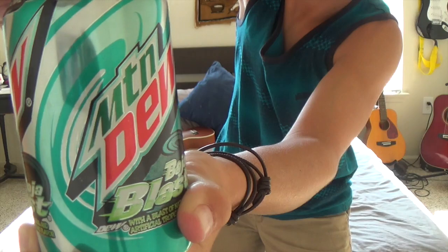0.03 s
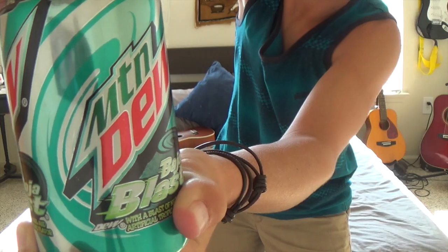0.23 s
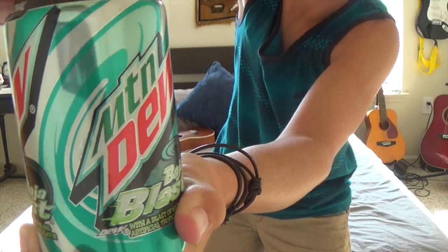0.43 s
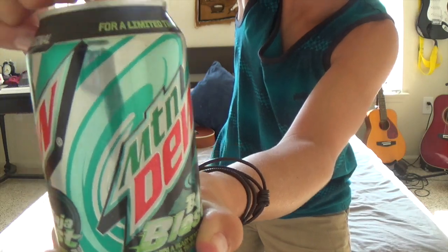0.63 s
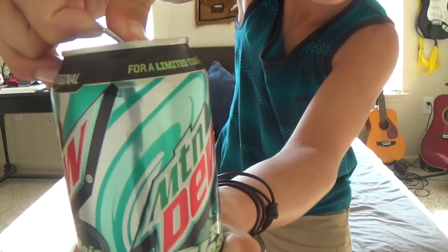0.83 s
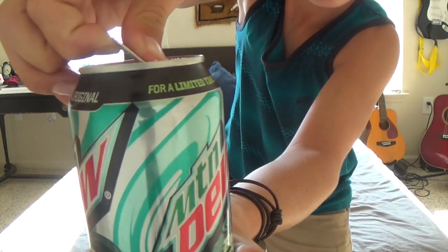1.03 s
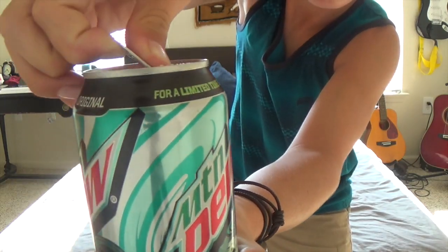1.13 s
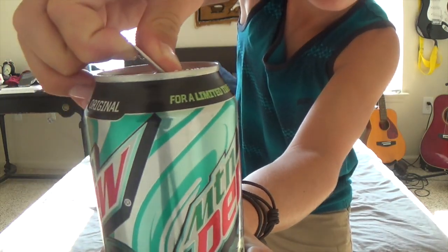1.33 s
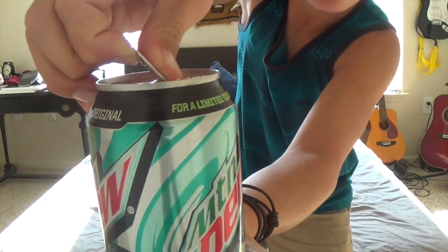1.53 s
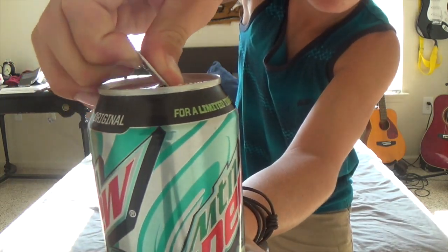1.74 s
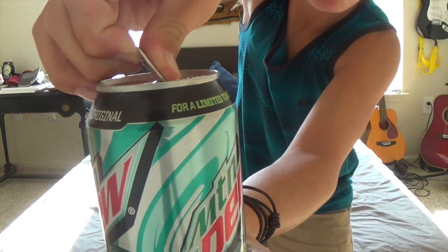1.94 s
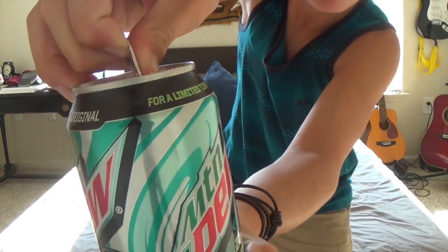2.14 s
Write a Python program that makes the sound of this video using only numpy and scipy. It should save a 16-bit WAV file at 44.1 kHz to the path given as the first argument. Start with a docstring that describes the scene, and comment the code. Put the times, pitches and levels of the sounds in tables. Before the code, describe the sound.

A drink can is opened close by in a small quiet room. At first there is only low room hiss, a faint electronic whine and soft finger rubbing. From about 1.4 seconds the lid clicks sharply, leaking wisps of gas. Another crack at 1.8 seconds leads into quickening metal snaps. At about 2.1 seconds the lid pops open and gas gushes out in a short, quickly fading hiss.

```python
"""A finger levers up the tab of an aluminium drink can, close by in a small quiet room.
Room rumble, hiss and a faint pulsing electronic whine come in first and stay; fingers rub the can.
From 1.4 s the strained lid clicks and lets out wisps of gas.
From 1.8 s its ring drops as the score tears in quickening snaps.
At 2.09 s the flap pops in and the gas gushes out, fading as the pressure drops."""
import sys
import numpy as np
from scipy import signal
from scipy.fft import rfft, irfft, next_fast_len
from scipy.io import wavfile
from scipy.ndimage import map_coordinates

SR = 44100
rng = np.random.default_rng(int(sys.argv[2]) if len(sys.argv) > 2 else 0)


def wav_record(signal):
    """Record a signal, one row per channel, as 16-bit PCM in the file named by sys.argv[1]."""
    frames = np.transpose(np.atleast_2d(signal))
    bounded = np.clip(frames, -1, 1)
    # unit amplitude maps onto the largest positive 16-bit level
    quanta = np.round(bounded * 32767).astype(np.int16)
    wavfile.write(sys.argv[1], SR, quanta)


N = 96402
T = np.arange(N) / SR

# lid snaps: start_s, crack_db, tilt_db_per_octave, top_db, low_hz, low_db, high_hz, high_db, hollow_db
SNAPS = [ (0.1803, -35, -6, -6, 4500, -45, 5600, -42, -75),
         (1.3984, 6.5, -.8, -3, 4000, -12, 5700, -10, -70), (1.4643, 6, 7, 4, 3980, -21, 5650, -16, -52),
         (1.4708, -8, -.5, -2, 4000, -35, 5620, -17, -58),
         (1.5412, -10.5, -4.5, -2, 4000, -44, 5700, -32, -50),
         (1.7803, 9, 1.5, -3.5, 5350, -14, 9850, -15, -38), (1.7881, -5, -3, -4, 5330, -23, 9800, -33, -46),
         (1.8479, -12, -4, -8, 4120, -18, 9600, -27, -39),
         (1.8533, -8, -3, -7, 4200, -18.5, 9500, -27, -41),
         (1.8805, -16, -1, -5, 4200, -33, 9400, -34, -54),
         (1.8915, -6, -2.5, -4, 4350, -28, 9300, -26, -41), (1.9063, -16, 1, -3, 4900, -47, 9300, -37, -60),
         (2.0067, -3.5, -5, 5, 5020, -23, 9130, -25, -33), (2.0356, 2, -2, -2, 4680, -12, 9040, -13, -34),
         (2.0455, -14, -1, -4, 4600, -27, 8900, -30, -52), (2.0549, -9, -4, -2, 4400, -28, 8950, -23, -41),
         (2.0595, 0, -3, 2, 4280, -14, 9000, -17, -37), (2.0688, 3.5, -1.5, 2, 4000, -18, 9100, -10, -36),
         (2.0740, 3, 0, 1, 3800, -29, 8900, -10, -38), (2.0808, -7, -3, 0, 3500, -33, 8800, -33, -41),
         (2.0823, -3, -2, 0, 3300, -29, 6000, -29, -41), (2.0852, 11, -2, 5, 3000, -18, 7000, -18, -30)]
# crack spectrum: freq_hz, level_db
CRACK_COLOUR = [(300, -40), (520, -33), (800, -25), (1400, -18), (2300, -14.5), (3200, -11), (4500, -4.5),
                (6100, -2), (7150, -13), (8300, -1), (10100, -3), (11150, -15), (12200, -3), (13600, -7),
                (14600, -10), (16000, -27)]
# reach of top_db: freq_hz, share
CRACK_TOP = [(10000, 0), (13500, 1)]
# lid overtones in every crack: pitch_hz, boost_db
LID_OVERTONES = [(6300, 5), (9100, 4), (10100, 6), (12500, 6), (13600, 4)]
# modes of the can's hollow at 2 s: pitch_hz, level_db, t60_s
HOLLOW_MODES = [(765, 0, .021), (1060, -3, .009), (1520, -2, .007), (1950, -1, .007)]
# the seam gives, then the flap: time_s, dip_db
PRESSURE_DIPS = [(1.4648, -39), (2.0864, -15)]
# noise envelopes: start_s, rise_s, hold_s, fall_db_per_s, level_db
SEEP_ENVELOPE = (2.05, .04, .005, 300, -36)
GUSH_ENVELOPE = (2.086, .024, .028, 115, -19.1)
SCRAPE_ENVELOPE = (2.022, .045, .012, 500, -45)
DRAUGHT_ENVELOPE = (2.088, .004, .016, 330, -46)
# gas after hard snaps: start_s, rise_s, hold_s, fall_db_per_s, level_db, treble_db, low_hz, high_hz
WISPS = [(1.403, .016, .012, 270, -42.6, -12, 4000, 5750), (1.467, .02, .017, 235, -31.3, -1, 3920, 5620),
         (1.786, .018, .018, 260, -37.7, -11, 4550, 5350)]
# reach of treble_db: freq_hz, share
WISP_TREBLE = [(7000, 0), (15000, 1)]
# gush balance, added left and taken from the right: freq_hz, gain_db
GUSH_PAN = [(200, 0), (500, -.7), (1000, -.6), (2500, -.3), (5000, .1), (10000, .25)]
# fingers shifting on the can: time_s, level_db
RUB_LEVELS = [(.09, -63), (.17, -69), (.3, -76), (.7, -69), (1.1, -65), (1.38, -65), (1.6, -76)]
# noise spectra: freq_hz, level_db
GUSH_COLOUR = [(100, -42), (400, -29), (800, -10.5), (1200, 1.6), (1550, -1), (2050, -7.3), (2900, .6),
               (3900, 1), (4700, -6), (5300, -5), (6400, -8), (7500, -5), (8600, -6), (10000, -2),
               (11500, -2), (13000, -7), (14300, -14), (15400, -44)]
WISP_COLOUR = [(300, -45), (700, -24), (1100, -20), (2300, -14), (3100, -17), (4500, -11), (6600, -9),
               (7300, -8.5), (8000, -4.5), (9600, 0), (10800, -6), (12000, -4), (15500, -11)]
DRAUGHT_COLOUR = [(30, 0), (70, -4), (160, -23), (1500, -110)]
RUB_COLOUR = [(500, -8), (1500, -2), (5000, 0), (7000, -2), (9500, 1), (14000, -7)]
ROOM_COLOUR = [(200, -6), (700, 1.5), (1500, 2.2), (3200, -2), (5600, .5), (7500, -3), (10000, -3.2),
               (15000, -5.5)]
FLOOR_COLOUR = [(20, -14), (30, -6), (45, -1), (80, -1), (150, 0), (260, -6.5), (400, -8.5), (800, -13),
                (1600, -16), (2800, -17.5), (4500, -18.8), (7000, -20.3), (9500, -19.3), (13000, -22.8),
                (15000, -26), (16000, -23.5)]
# left-right likeness of noise: freq_hz, correlation
GUSH_STEREO = [(200, .95), (800, .62), (3000, .62), (6000, .55), (7500, .98)]
ROOM_STEREO = [(200, .97), (1000, .65), (4000, .55), (6000, .65), (7500, .985)]
FLOOR_STEREO = [(60, 1.0), (180, 0.94), (550, 0.21), (1650, 0.18), (4970, 0.77), (15000, 1.0)]
# room decay: freq_hz, t60_s
ROOM_DECAY = [(200, .35), (1500, .45), (5500, .5), (10000, .36), (15000, .24)]


def lid(size=4096, hollow_rise_per_s=.35):
    """Each snap: a crack, two short rings of the strained lid, a knock of the can's hollow."""
    cracks, rings, knocks = np.zeros((3, N + size))
    t = np.arange(size) / SR
    for start_s, crack_db, tilt_db, top_db, low_hz, low_db, high_hz, high_db, hollow_db in SNAPS:
        onset = round(start_s * SR)
        span = slice(onset, onset + size)
        cracks[span] += amp(crack_db) * crack(t, tilt_db, top_db)
        rings[span] += ring(t, low_hz, low_db, t60_s=.0105, jitter_rad=.05)
        rings[span] -= ring(t, high_hz, high_db, t60_s=.0082, jitter_rad=.05)
        pitch_ratio = 1 + hollow_rise_per_s * (start_s - 2)  # rises as the lid lifts
        for k, (hz, db, t60_s) in enumerate(HOLLOW_MODES):
            knocks[span] -= (-1) ** k * ring(t, pitch_ratio * hz, hollow_db + db, t60_s)
    bass_cut = signal.butter(4, 600, 'highpass', fs=SR, output='sos')  # rings and knocks keep clear of the bass below 600 Hz
    return cracks[:N], signal.sosfilt(bass_cut, rings[:N]), signal.sosfilt(bass_cut, knocks[:N])


def crack(t, tilt_db_per_octave, top_db, rise_s=.00012, decay_s=.00055):
    """A millisecond of tearing metal, coloured by the lid."""
    burst = rng.standard_normal(len(t)) * np.exp(-t / decay_s) * (1 - np.exp(-t / rise_s))
    for _ in range(3):  # flatten the spectrum, keep the burst short
        spectrum = rfft(burst)
        burst = irfft(spectrum / (np.abs(spectrum) + 1e-9)) * np.exp(-(t / (6 * decay_s)) ** 2)
    hz = np.fft.rfftfreq(len(t), 1 / SR)
    octaves = np.log2(np.maximum(hz, 2000) / 9000)
    colour_db = along(CRACK_COLOUR, hz) + tilt_db_per_octave * octaves + top_db * along(CRACK_TOP, hz)
    colour_db += sum(db * peak(hz, pitch_hz, width_hz=220) for pitch_hz, db in LID_OVERTONES)
    return irfft(rfft(burst / np.linalg.norm(burst)) * minimum_phase(amp(colour_db)))


def ring(t, hz, db, t60_s, jitter_rad=0, rise_s=.00013):
    """One damped mode; jitter roughens it with a random walk of phase."""
    phase = 2 * np.pi * hz * t + jitter_rad * np.cumsum(rng.standard_normal(len(t)))
    return amp(db - 60 * t / t60_s) * np.sin(phase) * (1 - np.exp(-t / rise_s))


def pop(width_s=.0003, push_db=-26.5, suction_db=-41.5):
    """Each give of the lid dips the pressure; the flap adds a push of air and a slow suction."""
    dips = sum(amp(db) * np.exp(-((T - time_s) / width_s) ** 2) for time_s, db in PRESSURE_DIPS)
    age_s = np.maximum(T - PRESSURE_DIPS[-1][0], 0)
    lobe = lambda peak_s: (age_s / peak_s) ** 2 * np.exp(2 * (1 - age_s / peak_s))
    return amp(push_db) * lobe(peak_s=.0024) - amp(suction_db) * lobe(peak_s=.019) - dips


def gush():
    """Gas seeps through the tearing score, then bursts from the open flap."""
    seep = jet(SEEP_ENVELOPE, GUSH_COLOUR, GUSH_STEREO)
    burst = jet(GUSH_ENVELOPE, GUSH_COLOUR, GUSH_STEREO)
    return filtered(seep + burst, lambda hz: amp(np.outer([1, -1], along(GUSH_PAN, hz))))


def wisps(low_db=10.5, high_db=13.5, width_hz=370):
    """Gas leaks through the strained seam and sings in two resonances of the lid."""
    hz = np.linspace(100, SR / 2, num=400)
    leaks = np.zeros((2, N))
    for *envelope, treble_db, low_hz, high_hz in WISPS:
        colour_db = along(WISP_COLOUR, hz) + treble_db * along(WISP_TREBLE, hz)
        colour_db += low_db * peak(hz, low_hz, width_hz) + high_db * peak(hz, high_hz, width_hz)
        leaks += jet(envelope, np.column_stack([hz, colour_db]), ROOM_STEREO)
    return leaks


def jet(envelope, colour, stereo):
    """Sputtering noise that swells, holds and fades, like gas losing pressure."""
    start_s, rise_s, hold_s, fall_db_per_s, level_db = envelope
    attack = np.clip((T - start_s) / rise_s, 0, 1)
    falling_s = np.maximum(T - start_s - rise_s - hold_s, 0)
    gain = attack * amp(level_db - fall_db_per_s * falling_s)
    return gain * grain(depth_db=1, rate_hz=700) * stereo_noise(colour, stereo)


def draught():
    """Moving air rumbles at the microphone after the pop."""
    return jet(DRAUGHT_ENVELOPE, DRAUGHT_COLOUR, FLOOR_STEREO)


def scrape():
    """The tab grinds on the tearing score, coloured by the lid."""
    return grain(depth_db=5, rate_hz=700) * jet(SCRAPE_ENVELOPE, CRACK_COLOUR, ROOM_STEREO)


def fingers():
    """Faint grainy rubbing of skin on the can."""
    level_db = np.interp(T, *np.transpose(RUB_LEVELS))
    return amp(level_db) * grain(depth_db=4.5, rate_hz=350) * stereo_noise(RUB_COLOUR, ROOM_STEREO)


def room(mono, level_db=-11.5, delay_s=.004):
    """A diffuse stereo tail whose top treble dies first."""
    noise = stereo_noise(ROOM_COLOUR, ROOM_STEREO)[:, :SR // 2]
    hz, t, spectra = signal.stft(noise, SR, nperseg=256)
    decay = amp(-60 * t / along(ROOM_DECAY, hz)[:, None])
    tail = signal.istft(spectra * decay, SR, nperseg=256)[1]
    tail /= np.linalg.norm(tail[0])
    delayed = np.pad(mono, (round(delay_s * SR), 0))
    return amp(level_db) * signal.fftconvolve(delayed[None], tail, axes=1)[:, :N]


def whine(pitch_hz=2770, swing_hz=22, pulse_hz=29.9, level_db=-62.5):
    """A faint wavering electronic tone in narrow pulses."""
    pulses = np.abs(np.sin(np.pi * pulse_hz * T)) ** 10
    phase = 2 * np.pi * np.cumsum(pitch_hz + swing_hz * wobble(rate_hz=60)) / SR
    return amp(level_db) * pulses * np.sin(phase)


def background(floor_db=-58.4, whistle_hz=15735, whistle_db=-69):
    """Room rumble and hiss with a thin high whistle."""
    whistle = amp(whistle_db) * np.sin(2 * np.pi * whistle_hz * T)
    return amp(floor_db) * stereo_noise(FLOOR_COLOUR, FLOOR_STEREO) + whistle


def stereo_noise(colour, stereo):
    """Coloured noise of rms 1; the mid-side ratio sets its correlation."""
    def response(hz):
        angle = np.arccos(np.clip(along(stereo, hz), -1, 1)) / 2
        return amp(along(colour, hz)) * [np.cos(angle), np.sin(angle)]
    mid, side = filtered(rng.standard_normal((2, N)), response)
    return unit_rms(np.array([mid + side, mid - side]))


def grain(depth_db, rate_hz):
    """A flickering gain of rms 1."""
    return unit_rms(amp(depth_db * wobble(rate_hz)))


def wobble(rate_hz):
    """A smooth curve through random knots."""
    return map_coordinates(rng.standard_normal(int(N * rate_hz / SR) + 4), [T * rate_hz])


def filtered(x, response):
    """Zero-phase filter of gain response(hz)."""
    size = next_fast_len(x.shape[-1] + 8192)
    return irfft(rfft(x, size) * response(np.fft.rfftfreq(size, 1 / SR)), size)[..., :x.shape[-1]]


def minimum_phase(gain):
    """The causal response with this gain."""
    cepstrum = irfft(np.log(np.maximum(gain, 1e-6)))
    half = len(cepstrum) // 2
    cepstrum[1:half] *= 2
    cepstrum[half + 1:] = 0
    return np.exp(rfft(cepstrum))


def peak(hz, centre_hz, width_hz):
    """A resonance bump of height 1."""
    return 1 / (1 + ((hz - centre_hz) / width_hz) ** 2)


def along(points, hz):
    """Interpolate on a log frequency axis."""
    knots_hz, values = np.transpose(points)
    return np.interp(np.log(hz + 1), np.log(knots_hz + 1), values)


def amp(db):
    """Decibels to gain."""
    return 10 ** (np.asarray(db) / 20)


def unit_rms(x):
    """Scale to rms 1."""
    return x / np.sqrt(np.mean(x ** 2) + 1e-20)


def scene(pan_db=.3, ring_send_db=-5.5):
    """The can close by, its lid slightly left; the room behind it."""
    cracks, rings, knocks = lid()
    metal = (cracks + rings + knocks) * amp([[pan_db], [-pan_db]])
    gas = gush() + wisps()
    direct = metal + pop() + gas + draught() + scrape() + fingers()
    room_send = cracks + knocks + amp(ring_send_db) * rings + gas.mean(axis=0)
    return direct + room(room_send) + whine() + background()


def record(dry, start_s=.084, fade_s=.005, top_hz=16400, edge_hz=400):
    """A short silence, a quick fade-in and a steep low-pass."""
    fade_in = np.clip((T - start_s) / fade_s, 0, 1)
    return filtered(dry * fade_in, lambda hz: np.clip((top_hz - hz) / edge_hz, 0, 1))


dry = scene()
out = record(dry)
wav_record(out)
```